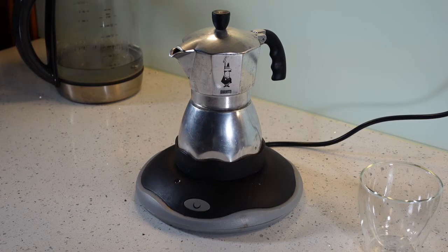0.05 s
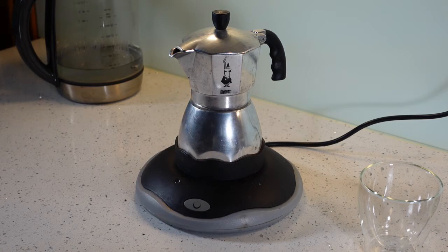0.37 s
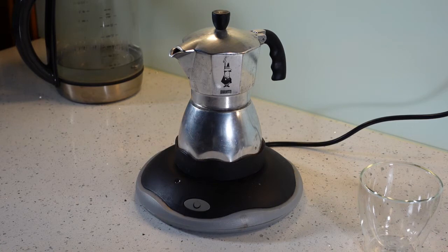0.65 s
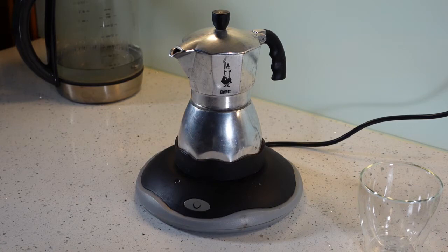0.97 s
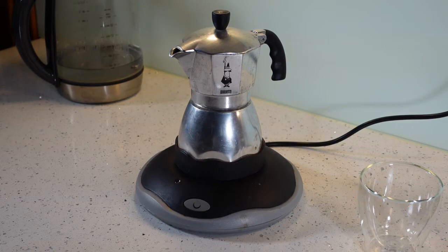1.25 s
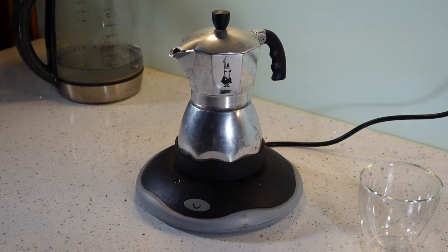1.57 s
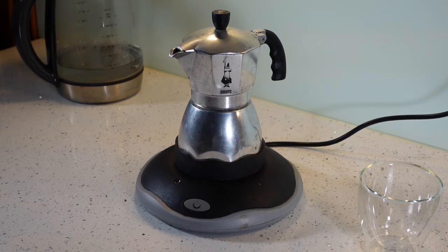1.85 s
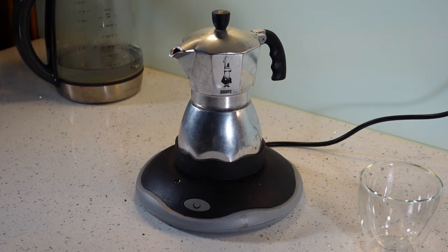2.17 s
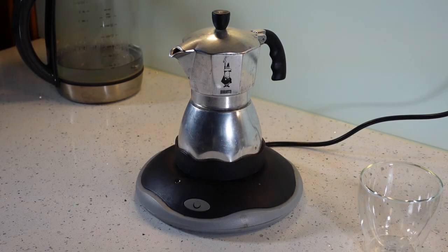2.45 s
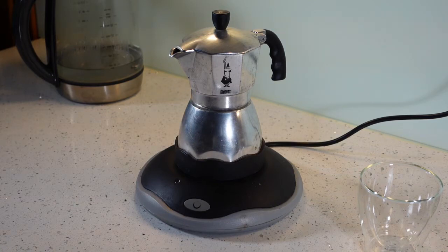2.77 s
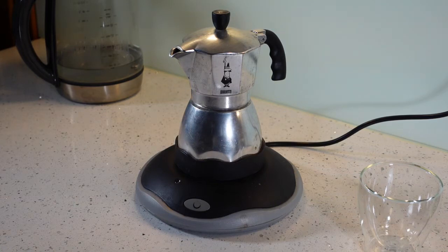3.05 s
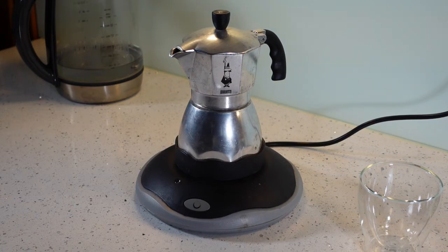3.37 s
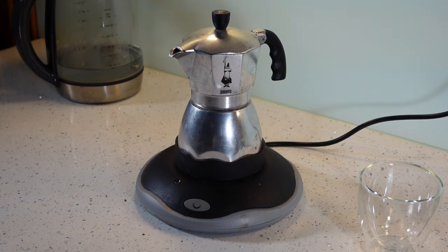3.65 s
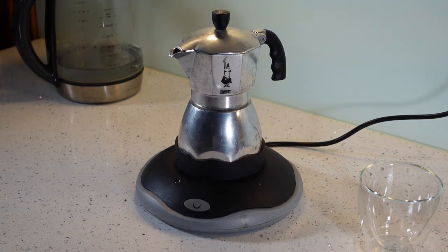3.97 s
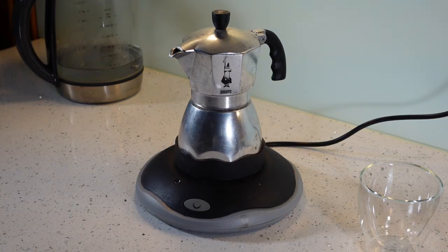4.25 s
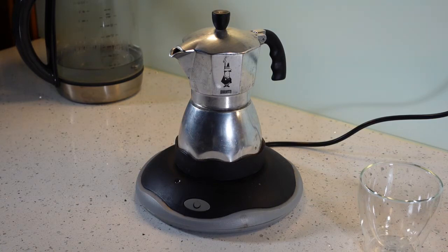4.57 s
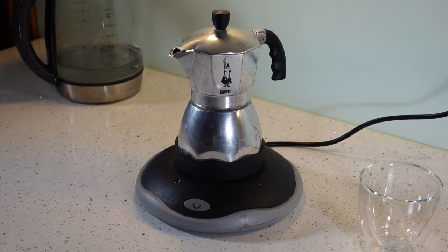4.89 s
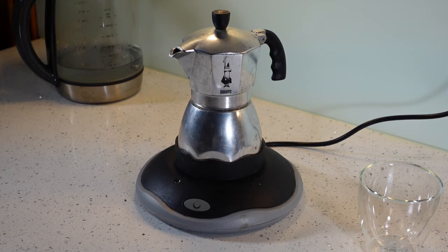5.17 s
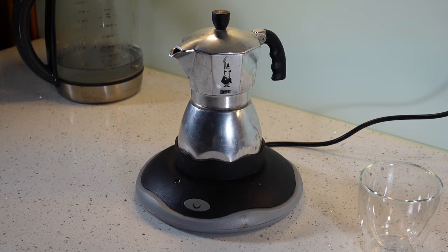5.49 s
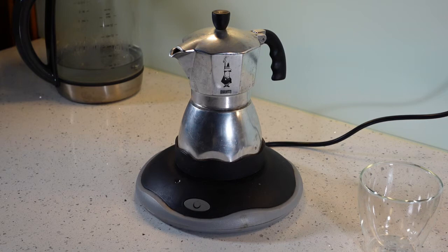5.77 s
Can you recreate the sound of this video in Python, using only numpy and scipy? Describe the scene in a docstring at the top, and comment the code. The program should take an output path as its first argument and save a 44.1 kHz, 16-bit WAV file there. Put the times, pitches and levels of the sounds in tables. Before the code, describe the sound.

Faint fizzing and short hisses from a heating metal coffee pot, with soft kitchen knocks and a loud, ringing spit near the end.

```python
"""A hard-walled kitchen, the microphone near an electric moka pot that warms up on the counter.
Tiny bubbles simmer against the metal boiler, and short spurts of hiss come and go.
Soft knocks, thuds and clicks echo from across the room, over a faint rush of air.
A low hum swells twice, and near the end one sharp, loud spit rings the metal and fills the room."""
import sys
import numpy as np
from scipy import signal
from scipy.fft import rfft, irfft, next_fast_len
from scipy.io import wavfile
from scipy.ndimage import uniform_filter1d

SR = 44100
rng = np.random.default_rng(int(sys.argv[2]) if len(sys.argv) > 2 else 0)


def output_pcm(signal):
    """Save a mono or channel-first signal as 16-bit PCM at the path in sys.argv[1].

    Samples are clipped to [-1, 1] before scaling.
    """
    pcm = np.clip(np.atleast_2d(signal).T, -1, 1) * 32767
    wavfile.write(sys.argv[1], SR, np.round(pcm).astype(np.int16))


N = 256794
T = np.arange(N) / SR

# envelopes of the spit's three parts (delay [s], attack [s], hold [s], release t60 [s], level [dB])
SPRAY_SWELL = (0, .016, .052, .14, -16.1)
BODY_SWELL = (.014, .018, .032, .12, -23.3)
SIZZLE_SWELL = (.014, .002, .003, .12, -20.3)
# spectra of the same three parts (frequency [Hz], level [dB])
SPRAY_SPECTRUM = [(700, -22), (1500, -17.5), (2400, -11.5), (3300, -4), (4800, -1.5), (6300, -7.5),
                  (8500, -11.5), (12000, -29.5), (15500, -34)]
BODY_SPECTRUM = [(45, -18), (160, -9.5), (250, -3.5), (380, -2.5), (520, -4), (800, -1), (1200, -3),
                 (2000, 1.5), (4000, -17)]
SIZZLE_SPECTRUM = [(5000, -2), (7500, -4), (10000, -0.5), (12000, -9), (14000, -1), (15500, -6)]
# modes of the pot's metal (frequency [Hz], level [dB], t60 [s])
METAL_MODES = [(557, -6, 0.36), (1113, -2.5, 0.25), (2360, -3, 0.25), (3010, -10, 0.56), (3280, -7, 0.26),
               (4800, 1, 0.16), (6000, -3, 0.17), (6908, -19, .3), (8760, -18, .25)]


def spit(start_s=5.379, metal_db=-13):
    """A crackling spray bursts out with a fine sizzle, its body follows, and the metal rings on."""
    def part(envelope, spectrum, rate, spread_db):
        delay, *shape = envelope
        return colour(grains(rate, spread_db), spectrum) * swell(start_s + delay, *shape)

    spray = part(SPRAY_SWELL, SPRAY_SPECTRUM, rate=3000, spread_db=2.7)
    body = part(BODY_SWELL, BODY_SPECTRUM, rate=4000, spread_db=2.2)
    sizzle = part(SIZZLE_SWELL, SIZZLE_SPECTRUM, rate=3000, spread_db=2.7)
    burst = spray + body + sizzle
    ring = np.zeros(N)
    for hz, db, t60 in METAL_MODES:
        width_hz = np.log(1000) / (np.pi * t60)  # the longer a mode rings, the narrower it is
        ring += undb(db) * unit(resonate(burst, hz, width_hz))
    return burst, unit(ring) * np.std(burst) * undb(metal_db)


# course of the simmer (time [s], wall ring level [dB], fizz level [dB])
SIMMER_LEVELS = [(0.0, -52, -63), (0.47, -50, -58), (1.05, -51, -64), (3.76, -50, -60), (4.1, -49, -55),
                 (4.57, -51, -61), (5.3, -49, -64)]
# resonances of the boiler (frequency [Hz], width [Hz], level [dB])
BOILER_MODES = [(1745, 76, -4.5), (2280, 100, -15), (2500, 60, -11), (3110, 43, -16), (3426, 270, -1),
                (3740, 200, -2), (4187, 290, 0), (4750, 214, -0.5), (5100, 230, -8.5), (5570, 180, -4.5),
                (7730, 770, -21), (10430, 130, -20)]
# spectrum of the finest bubbles (frequency [Hz], level [dB])
FIZZ_SPECTRUM = [(3000, 8.5), (6000, -1.5), (7200, -9.5), (8600, 2.5), (10500, -4), (12000, -8),
                 (13500, -1), (15500, -5)]


def simmer(ring_trim_db=-1.2, fizz_trim_db=.7, flutter_db=.57):
    """Tiny bubbles collapse on the hot floor of the boiler and ring its walls; the finest only fizz."""
    times, ring_db, fizz_db = np.transpose(SIMMER_LEVELS)
    bubbles = grains(rate=14000, spread_db=1.8)
    walls = sum(undb(db) * resonate(bubbles, hz, width) for hz, width, db in BOILER_MODES)
    walls = unit(signal.sosfilt(butter(3, 1400, "high"), walls))
    walls *= undb(np.interp(T, times, ring_db) + ring_trim_db)
    fizz = colour(grains(rate=20000, spread_db=1.8), FIZZ_SPECTRUM)
    fizz *= undb(np.interp(T, times, fizz_db) + fizz_trim_db)
    return (walls + fizz) * undb(flutter_db * walk(rate=18))


# spurts of hiss (time [s], length [s], level [dB], treble lift [dB])
SPURT_EVENTS = [(0.198, .138, -38, 3.7), (0.358, .16, -48.7, 4.3), (0.849, .064, -47, -1),
                (1.224, .034, -37.7, 1), (2.742, .062, -40.5, -3), (3.83, .165, -43, 2),
                (3.99, .17, -45.5, 2.5), (4.174, .08, -50.5, 6), (4.302, .1, -39, 0),
                (4.523, .094, -52, 1.5)]
# spectrum of the hiss (frequency [Hz], level [dB])
SPURT_SPECTRUM = [(700, -23), (1400, -15), (2100, -6.5), (4000, -2), (5600, -1), (7000, -5), (8700, -5),
                  (12000, -13), (15500, -21)]


def spurts(treble_hz=6500):
    """Short hisses open and close smoothly, some brighter than others."""
    flow, treble_flow = np.zeros((2, N))
    for s, length, db, lift_db in SPURT_EVENTS:
        puff = undb(db) * np.hanning(int(length * SR))
        add(flow, s, puff)
        add(treble_flow, s, puff * undb(lift_db))
    hiss = colour(rng.standard_normal(N), SPURT_SPECTRUM)
    treble = signal.sosfiltfilt(butter(2, treble_hz, "high"), hiss)
    return flow * (hiss - treble) + treble_flow * treble


# soft knocks, thuds and clicks echoing from across the kitchen
# (time [s], rattle decay [s], thud pitch [Hz], thud level [dB], knock pitch [Hz], knock level [dB])
DISTANT_KNOCKS = [(0.002, .005, 230, -54.5, 2300, -59), (0.662, .007, 480, -46.5, 1100, -48.5),
                  (0.695, .03, 410, -43.3, 1100, -55.5), (0.890, .015, 455, -43, 1350, -47),
                  (1.234, .016, 400, -60, 2350, -44), (1.546, .045, 380, -56, 1250, -50),
                  (2.308, .014, 225, -50.5, 2500, -56), (2.471, .004, 220, -43, 1600, -56),
                  (2.532, .005, 265, -39, 1850, -47.5), (2.633, .005, 265, -37.7, 1950, -42.2),
                  (3.129, .016, 300, -64.5, 1950, -47.3), (3.220, .008, 340, -59, 1500, -56),
                  (3.335, .04, 320, -57, 2600, -58), (3.436, .006, 275, -46.5, 1800, -46.5),
                  (3.529, .007, 315, -52.5, 900, -66), (3.863, .035, 200, -58.5, 2500, -52),
                  (4.751, .01, 240, -59, 2650, -41.5), (4.917, .009, 298, -68, 2700, -52),
                  (4.970, .05, 185, -50, 1600, -54), (5.229, .018, 230, -54, 2700, -44.5),
                  (5.265, .035, 115, -47, 750, -54), (5.310, .04, 250, -46, 2400, -50.5),
                  (5.417, .018, 100, -50, 2300, -50)]


def distant_knocks(click_above_hz=1500, click_over_db=1.8):
    """Each is a dull thud, a hollow knock and a bright click that follows the knock's pitch and level."""
    thuds, knocks, clicks = np.zeros((3, N))
    for s, decay_s, thud_hz, thud_db, knock_hz, knock_db in DISTANT_KNOCKS:
        click_hz, click_db = knock_hz + click_above_hz, knock_db + click_over_db
        add(thuds, s, knock_band(decay_s, thud_hz, thud_db, octaves=1.15, snap=.8, linger=1))
        add(knocks, s, knock_band(decay_s, knock_hz, knock_db, octaves=1, snap=.35, linger=.83))
        add(clicks, s, knock_band(decay_s, click_hz, click_db, octaves=1.25, snap=.55, linger=.83))
    return thuds, knocks, clicks


def knock_band(decay_s, hz, db, octaves, snap, linger, rebound_s=.02, rebound_db=-5):
    """One sharp impulse, a brief rattle and its rebound ring one band of a knock."""
    t = T[:SR // 4]
    rattle_s = decay_s * linger
    rebound = undb(rebound_db) * (t > rebound_s) * np.exp(-np.maximum(t - rebound_s, 0) / rattle_s)
    push = grains(rate=6000, spread_db=2.5, size=len(t)) * (np.exp(-t / rattle_s) + rebound)
    # the briefer the knock, the more its first impulse stands out
    push[0] += snap * np.linalg.norm(push) * np.exp(-decay_s / .017)
    edges_hz = hz * 2 ** (np.array([-.5, .5]) * octaves)
    ring = signal.sosfilt(butter(2, edges_hz, "band"), push + 1e-18)
    # the level is the energy spread over a twentieth of a second
    return undb(db) * ring * np.sqrt(SR / 20 / np.sum(ring ** 2))


# swells of the low hum (time [s], attack [s], hold [s], level [dB])
HUM_SWELLS = [(2.695, .028, .052, -44.8), (4.23, .09, .06, -47.5)]


def hum(hz=123, waver=.013, release_t60_s=.42):
    """A low tone swells twice, wavering slightly in pitch."""
    phase = 2 * np.pi * np.cumsum(hz * (1 + waver * walk(rate=10))) / SR
    gain = sum(swell(s, attack, hold, release_t60_s, db) for s, attack, hold, db in HUM_SWELLS)
    return np.sqrt(2) * np.sin(phase) * gain


def ping(start_s=3.135, hz=825, db=-47.5, bloom_s=.023, t60_s=.43):
    """One knock leaves a small ping that blooms and fades."""
    out, t = np.zeros(N), T[:SR // 2]
    envelope = undb(db) * (1 - np.exp(-t / bloom_s)) * fade(t, t60_s)
    add(out, start_s, envelope * np.sin(2 * np.pi * hz * t))
    return out


# room tone of the kitchen (frequency [Hz], level [dB])
AIR_SPECTRUM = [(25, -32), (60, -16), (110, -6.5), (210, 2.5), (350, -1), (600, -4.5), (1400, -9),
                (2400, -4), (5000, -13), (15000, -34)]


def air(level_db=-61.5, side_db=-4):
    """A faint, steady rush of air all around the microphone, as mid and side."""
    return [undb(level_db + db) * colour(rng.standard_normal(N), AIR_SPECTRUM) for db in (0, side_db)]


def echoes(direct, t60_s=.53, treble_t60_s=.39, early_db=-2, early_t60_s=.21, wall_s=.0145, wall_db=-5):
    """One path to the microphone: direct sound, a bounce off the near wall, sparse echoes, a tail."""
    t = T[:int(.6 * SR)]
    noise = rng.standard_normal(len(t))
    low = signal.sosfiltfilt(butter(2, 7000, "low"), noise)
    build_up = 1 - np.exp(-t / .0086)
    tail = (low * fade(t, t60_s) + (noise - low) * fade(t, treble_t60_s)) * build_up
    early = grains(rate=900, spread_db=2, size=len(t)) * fade(t, early_t60_s)
    response = tail / np.linalg.norm(tail) + undb(early_db) * early / np.linalg.norm(early)
    response[0] += direct
    # the wall mirrors long waves whole and scatters the short ones
    bounce = np.hanning(SR // 900)
    add(response, wall_s, undb(wall_db) * bounce / bounce.sum())
    return response / np.linalg.norm(response)


def room(x, direct_db, side_db, shift_hz=14):
    """Mid shifts between two spots with their own echoes; side carries only echoes."""
    turn = np.pi * shift_hz * T
    shares = np.sin(turn) ** 2, np.cos(turn) ** 2
    mid = sum(signal.oaconvolve(x * share, echoes(undb(direct_db)))[:N] for share in shares)
    side = undb(side_db) * signal.oaconvolve(x, echoes(direct=0))[:N]
    return np.array([unit(mid) * np.std(x), side])


def place(sound, left_db):
    """Mid and side to left and right, leaning a little to one side."""
    mid, side = sound
    return np.array([(mid + side) * undb(left_db / 2), (mid - side) * undb(-left_db / 2)])


def undb(db):
    """Decibels to gain."""
    return 10 ** (np.asarray(db) / 20)


def unit(x):
    """Scale to rms 1."""
    return x / np.sqrt(np.mean(x ** 2))


def butter(order, hz, kind):
    """Butterworth filter sections."""
    return signal.butter(order, hz, kind, fs=SR, output="sos")


def colour(x, spectrum):
    """Give a steady sound a smooth spectrum, at rms 1."""
    hz, db = np.transpose(spectrum)
    size = next_fast_len(len(x), real=True)
    f = np.fft.rfftfreq(size, 1 / SR) + 1
    bass_rolloff = np.minimum(1, f / hz[0]) ** 2
    gain = undb(np.interp(np.log(f), np.log(hz), db))
    return unit(irfft(rfft(x, size) * bass_rolloff * gain, size)[:len(x)])


def resonate(x, hz, width_hz):
    """Two-pole resonance, gain 1 at its centre."""
    return signal.lfilter(*signal.iirpeak(hz, hz / width_hz, fs=SR), x)


def grains(rate, spread_db, size=N):
    """Random clicks of uneven size, so many a second."""
    out, count = np.zeros(size), int(rate * size / SR) + 1
    clicks = rng.standard_normal(count) * undb(spread_db * np.minimum(rng.exponential(size=count), 4))
    out[rng.integers(0, size, count)] = clicks
    return unit(out)


def walk(rate):
    """Slow random wander at rms 1, so many steps a second."""
    hold = int(SR / rate)
    steps = np.repeat(rng.standard_normal(N // hold + 1), hold)
    return unit(uniform_filter1d(steps, hold)[:N])


def fade(t, t60):
    """Exponential decay, 60 dB down at t60."""
    return np.exp(-np.log(1000) * t / t60)


def swell(s, attack_s, hold_s, t60_s, db):
    """Gain over time: a straight rise, a hold, an exponential release."""
    rise = np.clip((T - s) / attack_s, 0, 1)
    return undb(db) * rise * fade(np.maximum(T - s - attack_s - hold_s, 0), t60_s)


def add(out, s, x):
    """Mix a sound in at a given time."""
    i = max(0, int(s * SR))
    out[i:i + len(x)] += x[:N - i]


def scene():
    """The simmer close, the knocks far off in the echoes; a narrow image just left of centre."""
    burst, ring = spit()
    thuds, knocks, clicks = distant_knocks()
    steady = room(simmer(), direct_db=7.5, side_db=-22)
    dull = room(thuds, direct_db=-3.5, side_db=-20.5)
    bright = room(knocks + clicks + spurts(), direct_db=-6, side_db=-16)
    loud = room(burst, direct_db=-5, side_db=-15.7)
    events = place(loud, left_db=.8) + place(dull + bright, left_db=.65)
    bed = place(steady + air(), left_db=-.05)
    return events + bed + ring + hum() + ping()


def record(dry, low_cut_hz=60, top_hz=15850):
    """The microphone thins the deep bass and cuts the top."""
    thin = signal.sosfilt(butter(2, low_cut_hz, "high"), dry)
    return signal.sosfilt(signal.ellip(10, .2, 80, top_hz, fs=SR, output="sos"), thin)


dry = scene()
out = record(dry)
output_pcm(out)
```